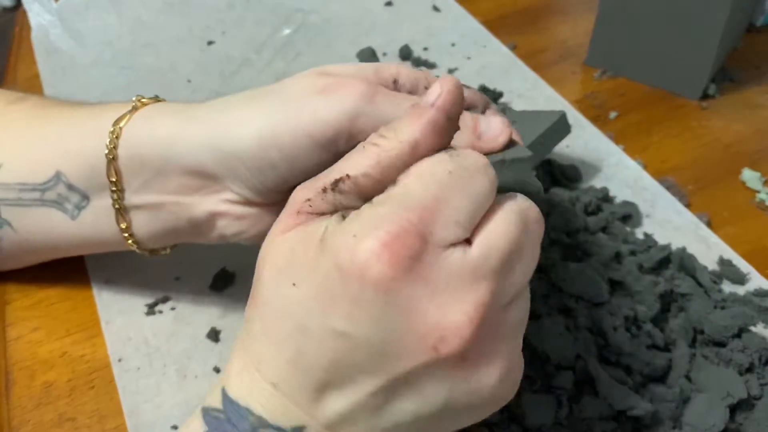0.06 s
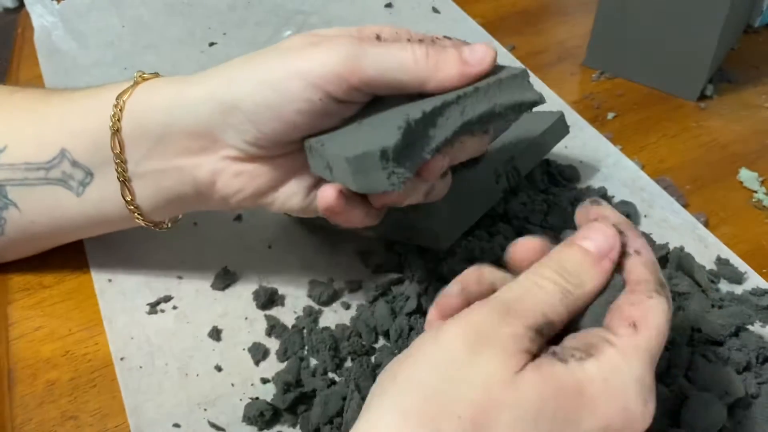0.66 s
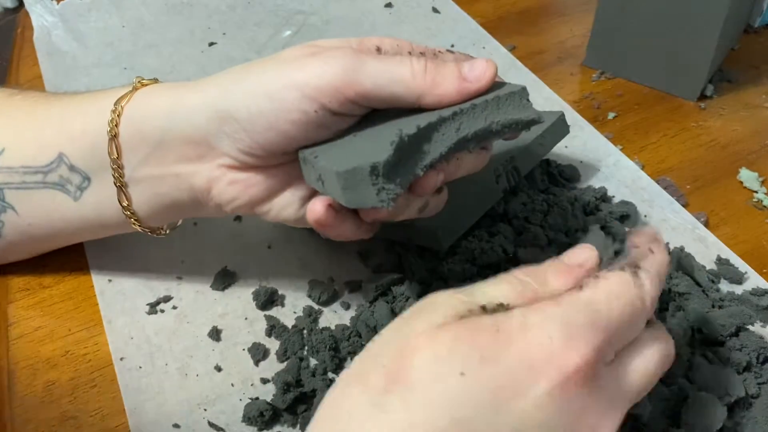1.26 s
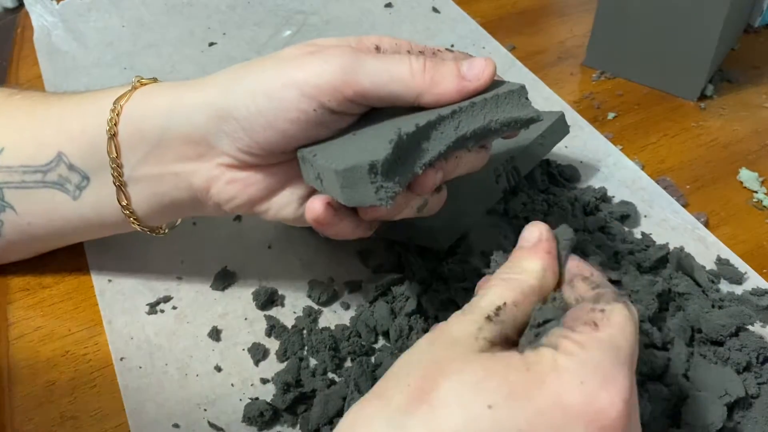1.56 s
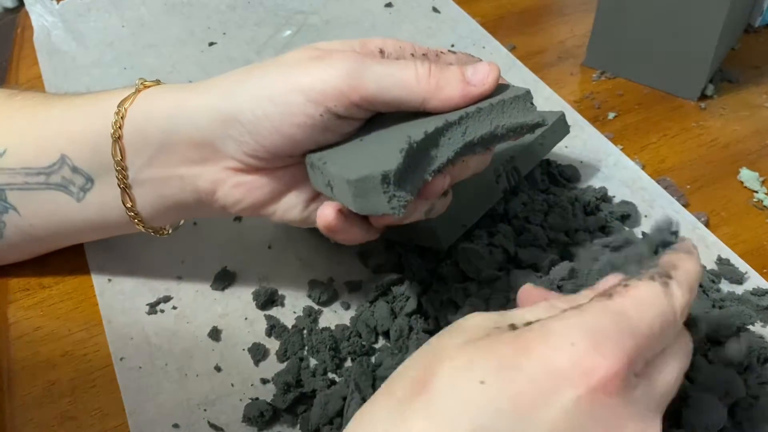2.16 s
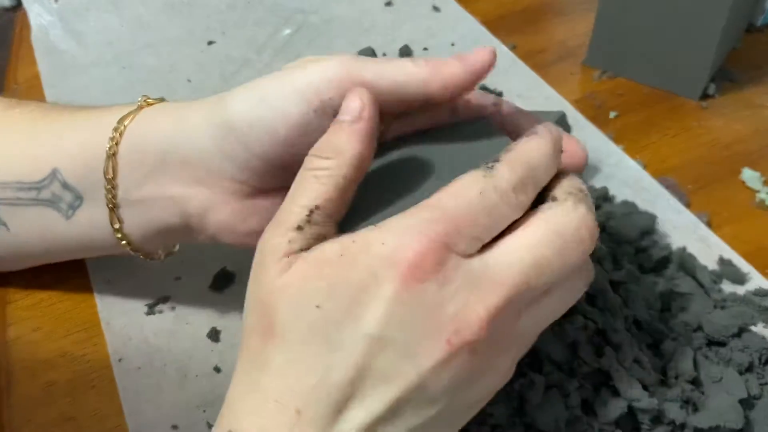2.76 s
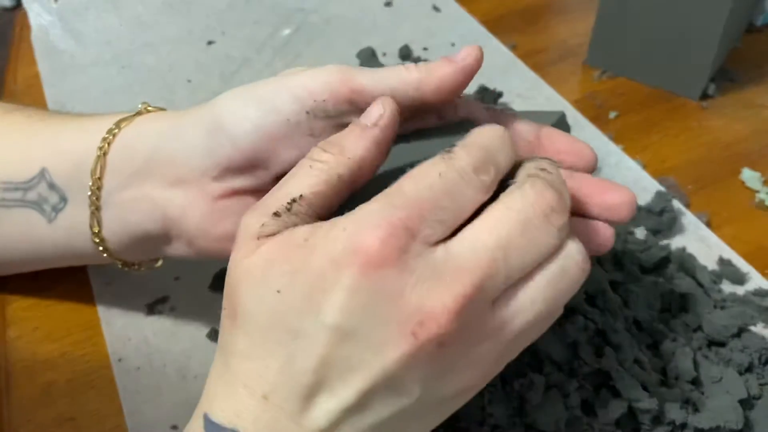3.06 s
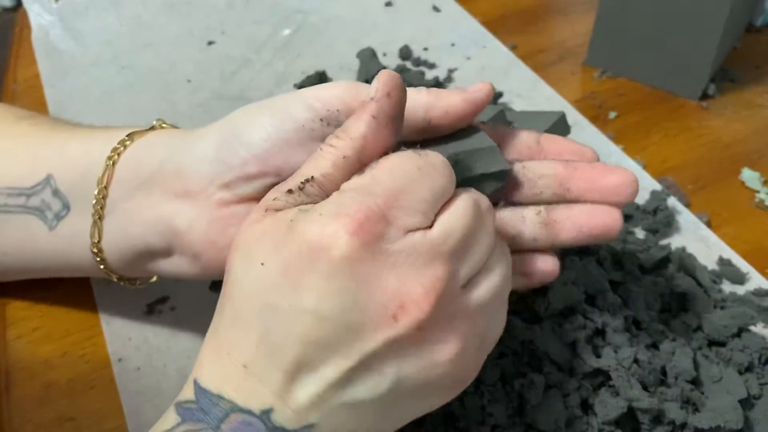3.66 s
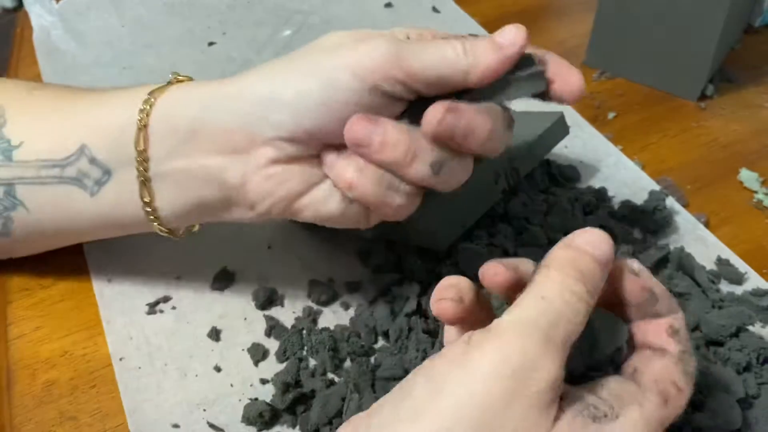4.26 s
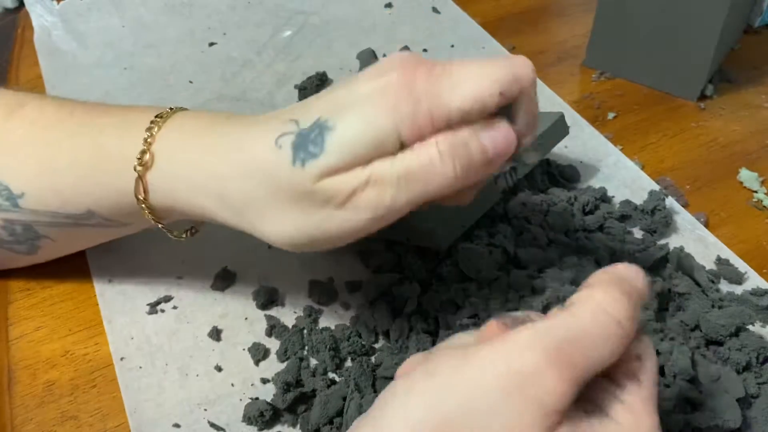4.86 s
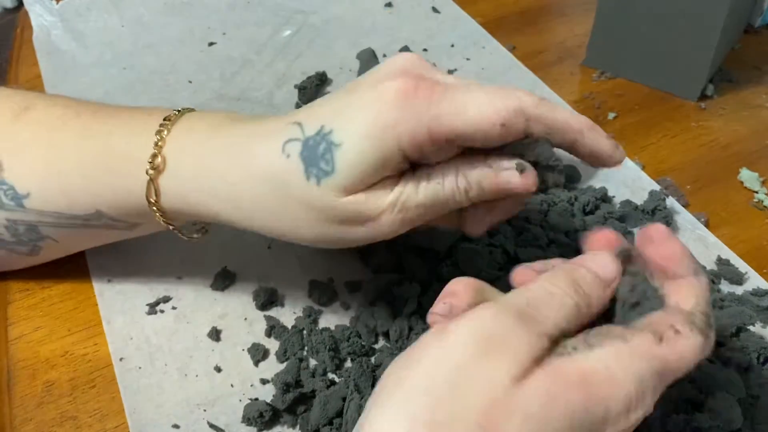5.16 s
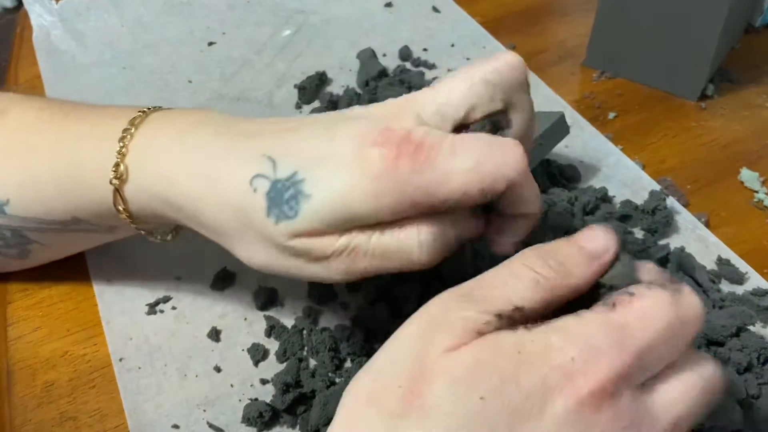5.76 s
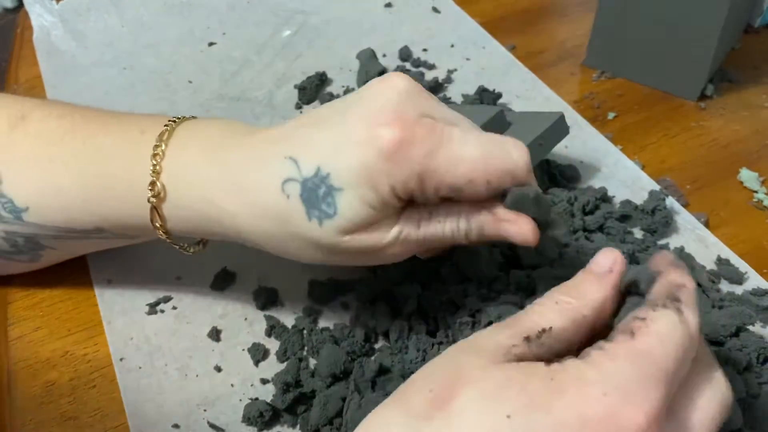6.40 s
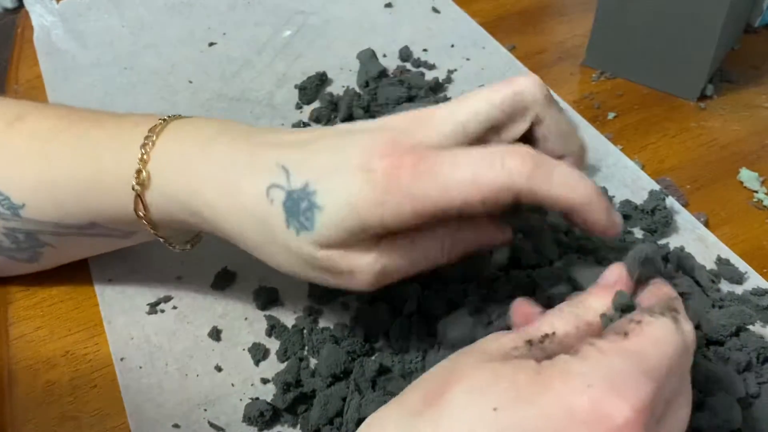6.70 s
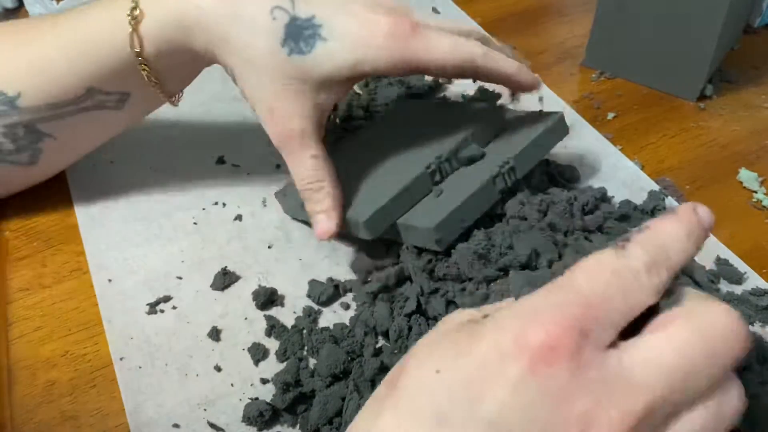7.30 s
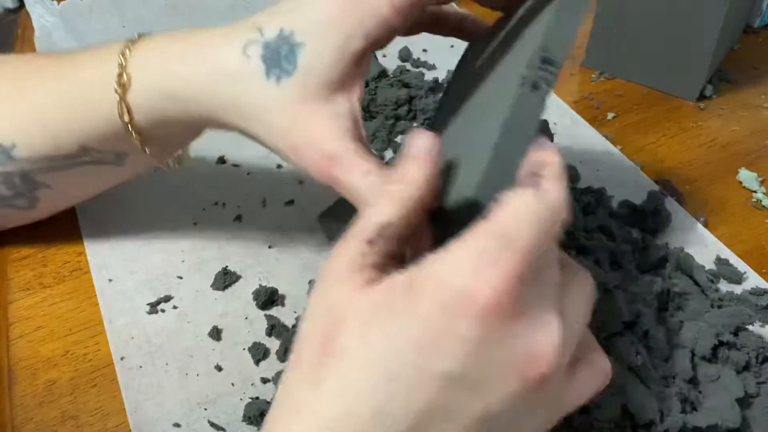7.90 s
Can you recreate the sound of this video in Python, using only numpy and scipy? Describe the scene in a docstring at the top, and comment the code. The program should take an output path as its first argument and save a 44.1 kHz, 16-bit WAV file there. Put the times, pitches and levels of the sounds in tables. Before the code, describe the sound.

Hands crush dry floral foam over a table, close to the microphone. A short crunch with a few snaps gives way to soft, gritty rubbing. A thick piece then breaks in a loud, hollow crunch packed with sharp snaps. Quieter crumbling and dusty fizz follow, with small lumps dropping, and a foam brick scrapes lightly near the end. The small room hums faintly.

```python
"""A crunch and a few sharp snaps: two hands crush dry floral foam over a table, close to two microphone ports.
Countless cell walls break: thick pieces crunch with a hollow body, small ones rasp, the dust fizzes.
Larger fractures snap out of the crunch, lumps drop on the table, a foam brick scrapes near the end.
Underneath, moving arms rumble the table and the room hums faintly."""
import numpy as np
from scipy import signal
from scipy.fft import rfft, irfft
import sys
import numpy as np
from scipy import signal
from scipy.fft import rfft, irfft
from scipy.io import wavfile

SR = 44100
rng = np.random.default_rng(int(sys.argv[2]) if len(sys.argv) > 2 else 0)


def dump(signal):
    """Clip the signal to [-1, 1] and save it as 16-bit WAV at the path in sys.argv[1]."""
    limited = np.clip(np.atleast_2d(signal).T, -1, 1)
    pcm = np.round(limited * 32767).astype(np.int16)
    wavfile.write(sys.argv[1], SR, pcm)


N = 354563
TIME_S = np.arange(N) / SR
BAND_EDGE_HZ = 16250
SAG_DB_PER_S, SETTLE_S = 10, 0.054  # held foam gives way; released crumbs settle
DRAG_STOP_S, ARM_REST_S, STILL_RUMBLE_DB = 0.015, 0.15, -81.5

# arm movements that rumble the table: (start [s], rise [s], hold [s], level [dB])
ARM_STROKES = [(-.02, .02, 0.056, -68), (0.345, .07, 0.28, -78.5), (0.94, 0.063, 0.017, -67.5),
               (1.277, 0.084, .04, -71.5), (2.574, 0.043, 0.22, -60.5), (3.078, 0.055, 0.072, -55.5),
               (3.423, 0.15, 0.038, -61), (3.722, 0.078, 0.25, -61.5), (4.25, 0.3, .06, -68.5),
               (5.846, .6, 0.51, -64.5), (7.251, 0.16, 0.39, -62)]
# table rumble: (frequency [Hz], density [dB])
RUMBLE_SPECTRUM = [(15, -10), (35, -12.5), (58, 4), (85, -4.5), (130, -5.5), (200, -15), (400, -15.5),
                   (1000, -68.5)]
# low hum, swelling and sinking: (time [s], level [dB])
HUM_LEVEL_DB = [(0, -76), (.4, -78.5), (.9, -74.5), (1.9, -76.5), (2.4, -77.5), (3.1, -63), (3.6, -69),
                (3.9, -64), (4.5, -67.5), (4.8, -73), (6, -77.5), (6.2, -61.5), (6.5, -67), (7.2, -65),
                (7.8, -62.5), (8.04, -80.5)]
# still air: (frequency [Hz], density [dB])
AIR_SPECTRUM = [(20, -9.5), (60, -3), (150, -2.5), (290, -1), (500, -13), (1000, -24), (4000, -18.5),
                (16000, -33)]
# room decay: (frequency [Hz], T60 [s])
ROOM_DECAY_S = [(200, .35), (1000, 0.2), (4000, 0.31), (16000, 0.15)]
# room tail colour: (frequency [Hz], gain [dB])
ROOM_GAIN_DB = [(200, 2.5), (3000, -0.5), (8000, -5.5), (16000, -6)]
# reflections off hands and table: (delay [s], gain [dB])
NEAR_ECHOES = [(.0009, -19.5), (.0014, -16.5), (.0023, -19), (.0037, -22.5), (.0068, -17)]
# phase between ports: (frequency [Hz], left lead [rad])
PORT_LEAD_RAD = [(50, 0), (700, 0.5), (2200, 1), (5500, 0.4), (6900, -.1), (8000, -1.6), (8700, -3.0),
                 (9300, -3.4), (10000, -4.6), (10700, -6.1), (11800, -6.6), (12800, -9.2), (13500, -9.6),
                 (14700, -12.4), (16500, -13)]
# level between ports: (frequency [Hz], left over right [dB])
PORT_BALANCE_DB = [(60, 1), (380, 2), (1200, 1.5), (2400, 2), (4400, 3.5), (8000, -1.5), (15000, -1)]
# likeness of the ports: (frequency [Hz], coherence [0-1])
PORT_COHERENCE = [(60, 1), (400, 0.67), (1200, 0.73), (2500, 0.9), (5000, 0.41), (8500, 1), (16000, 1)]
# where the piece is held: (time [s], left over right [dB])
PIECE_PAN_DB = [(0, 2), (.75, 1), (2.3, 1.6), (3.1, 1.5), (3.7, 1.5), (4.3, 2), (4.55, 0.4), (5.1, 2),
                (6.2, 0.8), (8, 2.5)]
# brick pushed over paper: (start [s], rise [s], hold [s], level [dB])
BRICK_STROKES = [(7.356, 0.0062, 0.024, -55), (7.454, 0.025, .004, -62.5), (7.53, 0.037, 0.024, -54)]
# brick resonances: (frequency [Hz], width [Hz], gain [dB])
BRICK_MODES = [(900, 65, 0), (1496, 70, 2.5), (2270, 530, -3.5), (3460, 310, -7.5)]
# lumps hitting palm and table: (time [s], level [dB], pitch [Hz], fade [s])
LUMP_KNOCKS = [(.002, -62, 298, 0.034), (.090, -49, 323, 0.048), (.288, -56, 1220, 0.012),
               (0.552, -54.5, 1800, 0.018), (1.146, -59.5, 1350, .018), (1.671, -53, 886, 0.012),
               (1.927, -49, 910, 0.0024), (4.150, -60, 720, 0.021), (4.621, -46, 1440, 0.0024),
               (4.633, -37.5, 1310, 0.0012), (4.644, -53.5, 1630, 0.059)]
# fractures: (time [s], level [dB], body re level [dB], fizz re level [dB])
FRACTURES = [(0.1264, -44, 7, 7), (0.135, -44, 2, 3), (0.1454, -39, 2, 6), (0.2506, -46.5, -0.5, 0),
             (0.7432, -40.5, -4.5, 7.5), (0.809, -47, -22, 7), (0.9711, -47.5, -7, -3),
             (0.9967, -47, -6, -10), (2.935, -40, -0.5, -22.5), (3.011, -29.5, 5, -10),
             (3.029, -26, -4, -3.5), (3.0648, -21.5, 1.5, -10.5), (3.1138, -19.5, 2, -12),
             (3.1356, -37, 7.5, 3.5), (3.143, -34, 13, -6.5), (3.1557, -28, 6.5, -6.5),
             (3.1594, -19.5, 6.5, -7), (3.173, -30.5, -7.5, 3), (3.2147, -35, -5.5, 3),
             (3.2585, -27.5, 7.5, -4), (3.281, -31, -12, -5.5), (3.3754, -28, 4.5, -4),
             (3.4014, -40.5, 10.5, 3.5), (3.426, -24.5, -14, -33), (3.4489, -25, -27, -17),
             (3.4518, -32, 10, 7.5), (3.47, -32.5, 13.5, -18), (3.4806, -36, 4, -22),
             (3.5945, -29.5, -4.5, -1.5), (3.6538, -34, 3.5, -12), (3.8811, -45, -5, 1.5),
             (4.2982, -49.5, -24, -21), (4.3658, -42, -9.5, 0), (4.514, -47, -20, 23.5),
             (4.8803, -53, -5, 3), (4.8968, -44.5, -5.5, -1), (4.9099, -50.5, -3, 14),
             (4.9535, -44.5, -12, 0), (5.4757, -55.5, -22, 13), (6.0666, -46, 3, -4),
             (6.1312, -40, -6.5, -3), (6.3145, -33, -33, -9)]
# snapping piece, too light to carry bass: (frequency [Hz], density [dB])
SNAP_BODY_SPECTRUM = [(100, -39.5), (280, -24), (450, -13.5), (650, -5), (950, -3), (1400, -3), (2000, -6),
                      (4000, -24.5)]
# hollow body of crushed foam: (frequency [Hz], density [dB])
HOLLOW_SPECTRUM = [(100, -30.5), (230, -17), (400, -3.5), (600, -2), (850, -1.5), (1300, -3), (1900, -6.5),
                   (2800, -9.5), (5000, -28)]
# thick pieces: (frequency [Hz], density [dB])
CRUNCH_SPECTRUM = [(300, -37.5), (800, -22), (1400, 0), (2100, 1), (2700, 3), (3400, -1.5), (4400, -1),
                   (5600, -5), (7500, -7), (10000, -20), (16000, -33.5)]
# small crumbs: (frequency [Hz], density [dB])
RASP_SPECTRUM = [(300, -39.5), (800, -25), (1400, -8.5), (2100, -6.5), (3000, -2), (4400, -0.5),
                 (5600, -1.5), (7500, -2), (10000, -12.5), (16000, -24.5)]
# dust: (frequency [Hz], density [dB])
FIZZ_SPECTRUM = [(2500, -26.5), (5000, -13.5), (7000, 0), (8500, -0.5), (11000, -0.5), (13000, -3.5),
                 (15500, -1), (17000, -22.5)]
# hand cavity, higher as it closes: (time [s], resonance [Hz])
PALM_HZ = [(0, 920), (.4, 1060), (1.15, 1481), (1.9, 1214), (2.75, 760), (3.05, 644), (3.2, 892),
           (3.5, 1300), (3.65, 961), (4.2, 884), (4.65, 1417), (5.25, 1661), (5.7, 1905), (6.2, 1525),
           (7.1, 1457), (7.6, 897)]
# air gaps between fingers and pieces: (resonance [Hz], width [Hz])
GAP_MODES = [(2000, 190), (2800, 130), (3800, 180), (5200, 270)]
# lumps caving in at once: (time [s], level [dB], fade [s])
CAVE_INS = [(0.738, -32.5, 0.013), (3.160, -48, 0.01), (3.449, -33.5, 0.039), (3.892, -42.5, 0.018),
            (4.366, -49, 0.02), (6.064, -52, 0.017), (6.127, -42.5, 0.016), (6.316, -44, 0.017)]
# finger presses; smaller crumbs rasp higher:
# (start [s], rise [s], hold [s], crunch [dB], hollow re crunch [dB], fizz re crunch [dB], rasp [Hz])
PRESSES = [(-.028, .019, 0.056, -35.5, -4, -1.5, 2400), (0.084, 0.029, 0.016, -42.5, -5, 3.5, 3000),
           (0.226, 0.065, 0.16, -60.5, -13.5, -0.5, 3700), (0.531, .023, 0.043, -57.5, -14.5, -.5, 4030),
           (0.621, .13, 0.069, -47, -20, 0, 4260), (0.904, 0.096, 0.017, -53.5, -15.5, 2, 4170),
           (1.118, 0.023, 0.17, -68, -10, 0, 3120), (1.298, 0.044, 0.11, -58.5, -17, -1.5, 4030),
           (1.469, 0.041, .078, -54, -16, -1, 4270), (1.597, .17, 0.098, -62.5, -11.5, 0.5, 3950),
           (1.88, 0.032, 0.047, -59, -15, -3, 3520), (2.069, 0.052, 0.32, -65, -19, -3.5, 4515),
           (2.192, .15, 0.028, -53.5, -23, -7, 4640), (2.412, 0.073, 0.25, -59, -8.5, 2, 3680),
           (2.61, 0.16, .005, -52, -3.5, -3, 2950), (2.781, .12, 0.074, -53.5, -2.5, 0.5, 3340),
           (2.963, 0.067, 0.035, -47, 4, 1, 3120), (3.096, 0.073, 0.0061, -32.5, -3, -5.5, 2390),
           (3.227, 0.03, 0.019, -38, -1, -1.2, 2760), (3.348, 0.041, .11, -41, 0, 1, 2480),
           (3.547, .052, 0.075, -39.5, -6.5, 1, 4200), (3.77, .13, 0.055, -56.5, -9, 5.5, 3096),
           (3.992, .21, .014, -57.5, -16, 1.5, 3480), (4.293, .16, 0.072, -44, -14.5, 4, 5060),
           (4.504, 0.085, 0.21, -54, -8, 4.5, 4560), (4.797, 0.067, 0.14, -55, -12.5, 2.5, 4570),
           (4.948, 0.13, 0.11, -54, -22, -0.5, 4140), (5.138, 0.07, 0.21, -53.5, -16, 2.5, 4000),
           (5.353, .11, 0.046, -54, -16.5, 2.5, 4550), (5.536, 0.044, 0.19, -55, -11, 0.5, 3770),
           (5.74, .1, .25, -59, -7.5, -0.5, 4170), (6.056, 0.092, 0.081, -46.5, -16.5, -0.5, 4400),
           (6.281, 0.031, 0.093, -50.5, -17, 4, 4880), (6.439, 0.047, 0.086, -68.5, -7.5, 7, 3870),
           (6.548, 0.14, 0.032, -55, -10, -3, 4520), (6.714, .05, 0.066, -62.5, -17, 5, 4430),
           (6.836, 0.059, .008, -50.5, -22, -3, 5310), (6.93, 0.024, 0.016, -56, -23, 4.5, 5050),
           (7.018, 0.059, 0.035, -64, -13.5, 0, 4600), (7.146, 0.042, .015, -66.5, -8.5, 4, 4560),
           (7.26, .04, .04, -78, -2, 8, 4010), (7.357, 0.015, 0.023, -61.5, -1, 2, 2770),
           (7.46, 0.097, 0.018, -57, -4, -2.5, 3000), (7.701, .02, 0.13, -72.5, -8, 1, 3600),
           (7.91, 0.03, 0.065, -66.5, -6, -0.5, 3690), (8.014, 0.032, .02, -54.5, -6.5, 0, 4040)]


def amp(db):
    return 10 ** (np.asarray(db) / 20)


def unit_rms(x):
    return x / np.sqrt(np.mean(x ** 2) + 1e-20)


def at_hz(table, hz):
    """Table value, interpolated on a log-frequency axis."""
    table_hz, value = np.transpose(table)
    return np.interp(np.log(hz + 1), np.log(table_hz + 1), value)


def gain_curve(levels):
    """Gain per sample from (time [s], level [dB])."""
    return amp(np.interp(TIME_S, *np.transpose(levels)))


def add(mix, start_s, sound):
    part = mix[:, max(round(start_s * SR), 0):][:, :sound.shape[1]]
    part += sound[:, :part.shape[1]]


def colour(x, spectrum, size=2048):
    """Minimum-phase filter: clicks keep their sharp front."""
    log_gain = np.log(amp(at_hz(spectrum, abs(np.fft.fftfreq(size, 1 / SR)))))
    response = np.exp(np.conj(signal.hilbert(log_gain)))
    taps = np.fft.ifft(response).real[:size // 2]
    return signal.oaconvolve(x, taps[None], axes=1)[:, :x.shape[1]]


def resonate(x, hz, width_hz):
    return signal.lfilter(*signal.iirpeak(hz, hz / width_hz, SR), x)


def glide(x, track, width_hz):
    """Moving resonance along (time [s], frequency [Hz])."""
    hz = np.interp(TIME_S, *np.transpose(track))
    carrier = np.exp(2j * np.pi * np.cumsum(hz) / SR)
    pole = np.exp(-np.pi * width_hz / SR)
    return 2 * (carrier * signal.lfilter([1 - pole], [1, -pole], x / carrier)).real


def wander(rate_hz):
    """Smooth random drift, rms 1."""
    rolloff = 1 + (np.fft.rfftfreq(N, 1 / SR) / rate_hz) ** 4
    return unit_rms(irfft(rfft(rng.standard_normal(N)) / rolloff, N))


def stroke(start_s, rise_s, hold_s, release_s):
    """Gain of one movement: force builds, sags while held, dies away."""
    age_s = TIME_S - start_s
    held_s = np.maximum(age_s - rise_s, 0)
    attack = np.clip(age_s / max(rise_s, 1e-3), 0, 1)
    release = np.exp(-np.maximum(held_s - hold_s, 0) / release_s)
    return attack * amp(-SAG_DB_PER_S * held_s) * release


def background(hum_hz=119, hum_width_hz=14, air_db=-73):
    """Table rumble under moving arms, a wavering hum, still air."""
    rumble, hum, air = rng.standard_normal((3, 2, N))
    arms = sum(amp(db) * stroke(*timing_s, ARM_REST_S) for *timing_s, db in ARM_STROKES)
    rumble = unit_rms(colour(rumble, RUMBLE_SPECTRUM, size=8192)) * np.hypot(arms, amp(STILL_RUMBLE_DB))
    hum = resonate(resonate(hum, hum_hz, hum_width_hz), hum_hz, hum_width_hz)
    hum = unit_rms(hum) * gain_curve(HUM_LEVEL_DB)
    return rumble + hum + amp(air_db) * unit_rms(colour(air, AIR_SPECTRUM))


def room(x, gap_s=0.0025):
    """Diffuse tail, different at each port; the top treble dies first."""
    noise = rng.standard_normal((2, SR // 2)) * (np.arange(SR // 2) > gap_s * SR)
    hz, age_s, bins = signal.stft(noise, SR, nperseg=256)
    decay = amp(-60 * age_s / at_hz(ROOM_DECAY_S, hz)[:, None])
    _, tail = signal.istft(bins * decay, SR)
    wet = signal.fftconvolve(x, tail / np.linalg.norm(tail[0]), axes=1)[:, :N]
    return colour(wet, ROOM_GAIN_DB)


def reflect(x, sway=0.11, cutoff_hz=5000):
    """Adds dull echoes off hands and table; paths drift as the hands move."""
    dull = signal.lfilter(*signal.butter(1, cutoff_hz, fs=SR), x)
    out = x.copy()
    for delay_s, db in NEAR_ECHOES:
        for port in range(2):
            path_s = delay_s * (1 + sway * wander(rate_hz=1.7))
            out[port] += amp(db) * np.interp(TIME_S - path_s, TIME_S, dull[port])
    return out


def place(spectra):
    """Two spectra to port signals, with the phase and balance of the hands' position."""
    hz = np.fft.rfftfreq(N, 1 / SR)
    tilt = amp(at_hz(PORT_BALANCE_DB, hz) / 2)
    right_lag = np.exp(-1j * at_hz(PORT_LEAD_RAD, hz))
    return irfft(spectra * np.array([tilt, right_lag / tilt]), N)


def ports(x):
    """The two ports hear partly the same sound."""
    coherence = np.clip(at_hz(PORT_COHERENCE, np.fft.rfftfreq(N, 1 / SR)), 0, 1)
    left, other = rfft(x)
    right = coherence * left + np.sqrt(1 - coherence ** 2) * other
    return place(np.array([left, right]))


def cell_clicks(per_s, spread_db=0.0):
    """Cell walls break at random times with random strength; rms 1."""
    size = amp(spread_db * np.minimum(rng.exponential(1, N), 4.5))
    breaks = rng.random(N) < per_s / SR
    return unit_rms(size * breaks * rng.standard_normal((2, N)))


def brick_scrape():
    """Grit catches under a whole brick and rings it."""
    grit = cell_clicks(per_s=8500, spread_db=2.5)
    ring = sum(amp(db) * resonate(grit, hz, width_hz) for hz, width_hz, db in BRICK_MODES)
    pushes = sum(amp(db) * stroke(*timing_s, DRAG_STOP_S) for *timing_s, db in BRICK_STROKES)
    return unit_rms(ring) * pushes


def lump_knocks(width_ratio=0.61, size=12000):
    """Light lumps land with a dull, noisy tock."""
    out, age_s = np.zeros((2, N)), np.arange(size) / SR
    for start_s, db, hz, fade_s in LUMP_KNOCKS:
        decay = np.exp(-age_s / fade_s)
        burst = decay * rng.standard_normal((2, size))
        tock = resonate(resonate(burst, hz, width_ratio * hz), hz, 2 * width_ratio * hz)
        add(out, start_s, amp(db) * unit_rms(tock) * np.sqrt(np.mean(decay ** 2)))
    return out


def fineness(rasp_hz, thick_hz=2400, small_hz=4600):
    """0 for a thick piece, 1 for small crumbs."""
    return np.clip((rasp_hz - thick_hz) / (small_hz - thick_hz), 0, 1)


def snaps(rasp_hz, run_up_s=0.00028, scatter=0.24, size=1024):
    """A crack starts as fizz and lets go in one pulse; the body rattles a little longer."""
    out = np.zeros((2, N))
    age_s = (np.arange(size) - size // 8) / SR
    for time_s, db, body_db, fizz_db in FRACTURES:
        grit = rng.standard_normal(size) + 0.59 * rng.standard_normal((2, size))
        is_crumb = fineness(rasp_hz[round(time_s * SR)]) > 0.5
        fizz = (FIZZ_SPECTRUM, fizz_db - 7, -0.0003, 0.0006)
        piece = (RASP_SPECTRUM if is_crumb else CRUNCH_SPECTRUM, -7.3, 0, 0.0008)
        body = (SNAP_BODY_SPECTRUM, body_db - 11.5, 0.0002, 0.001)
        for spectrum, voice_db, lag_s, rattle_s in (fizz, piece, body):
            envelope = np.exp(np.where(age_s < 0, age_s / run_up_s, -age_s / rattle_s))
            crack = (age_s == 0) + scatter * envelope * grit
            add(out, time_s + age_s[0] + lag_s, amp(db + voice_db) * unit_rms(colour(crack, spectrum)))
    return out


def finger_presses():
    """Presses sum in power: gains of crunch, hollow body and dust; power-weighted rasp pitch."""
    crunch, hollow, dust, pitch = np.zeros((4, N))
    for *timing_s, db, hollow_db, fizz_db, rasp_hz in PRESSES:
        power = (amp(db) * stroke(*timing_s, SETTLE_S)) ** 2
        crunch += power
        hollow += power * amp(hollow_db) ** 2
        dust += power * amp(fizz_db) ** 2
        pitch += power * rasp_hz
    return np.sqrt(crunch), np.sqrt(hollow), np.sqrt(dust), pitch / (crunch + 1e-30)


def finger_gaps(x, share=0.91, drift=0.13):
    """Air gaps open and close: narrow resonances drift through the crunch."""
    rings = (glide(x, np.c_[TIME_S, hz * np.exp(drift * wander(rate_hz=4))], width_hz)
             for hz, width_hz in GAP_MODES)
    return x + share * sum(rings)


def crumbling(crunch_gain, hollow_gain, dust_gain, rasp_hz, clump_db=1.38, flutter_db=1.46, chip_db=-14,
              ring_share=0.2, cave_rise_s=0.0018, crunch_db=-0.08, hollow_db=-0.2, dust_db=0.32):
    """Cell walls fail in small avalanches, with stray chips; piece size blends crunch into rasp."""
    avalanches = amp(clump_db * wander(rate_hz=95) + flutter_db * wander(rate_hz=17))
    chips = amp(chip_db) * cell_clicks(per_s=100)

    def voice(spectrum, per_s, spread_db):
        return unit_rms(colour(cell_clicks(per_s, spread_db) * avalanches + chips, spectrum))

    thick = voice(CRUNCH_SPECTRUM, per_s=5000, spread_db=-1.5)
    small = voice(RASP_SPECTRUM, per_s=9600, spread_db=0.0)
    body = voice(HOLLOW_SPECTRUM, per_s=4500, spread_db=1.5)
    dust = voice(FIZZ_SPECTRUM, per_s=20000, spread_db=0.5)
    fine = fineness(rasp_hz)
    walls = np.sqrt(1 - fine) * thick + np.sqrt(fine) * small
    ring = glide(walls, np.c_[TIME_S, rasp_hz], width_hz=1300)
    crunch = unit_rms(finger_gaps(walls + ring_share * ring))
    hollow = unit_rms(body + glide(body, PALM_HZ, width_hz=300))
    out = crunch * crunch_gain * amp(crunch_db)
    out += hollow * hollow_gain * amp(hollow_db)
    out += dust * dust_gain * amp(dust_db)
    for start_s, db, fade_s in CAVE_INS:
        age_s = np.maximum(TIME_S - start_s, 0)
        out += crunch * amp(db) * (1 - np.exp(-age_s / cave_rise_s)) * np.exp(-age_s / fade_s)
    return out


def scene(room_db=-15):
    """Foam close by, in a small quiet room."""
    *gains, rasp_hz = finger_presses()
    foam = ports(crumbling(*gains, rasp_hz) + lump_knocks() + brick_scrape())
    foam += place(rfft(snaps(rasp_hz)))
    pan = gain_curve(PIECE_PAN_DB) ** np.array([[0.5], [-0.5]])
    foam = reflect(foam) * pan
    return foam + amp(room_db) * room(foam) + ports(background())


def record(dry):
    """Steep low-pass at the band edge."""
    taps = signal.firwin(255, BAND_EDGE_HZ, window=("kaiser", 8), fs=SR)
    return signal.oaconvolve(dry, taps[None], "same")


dry = scene()
out = record(dry)
dump(out)
```